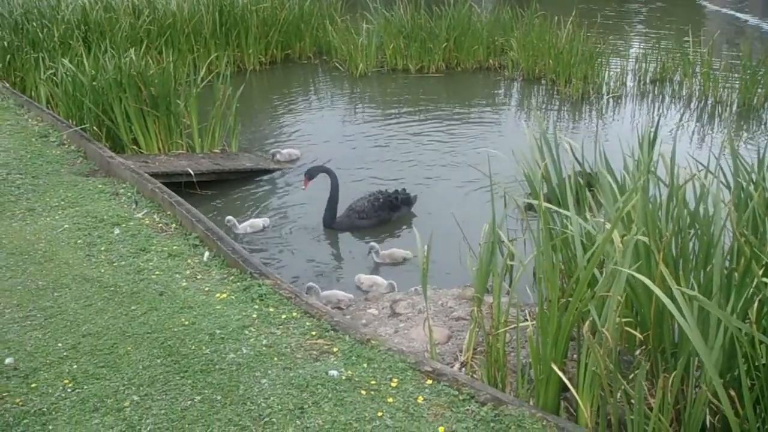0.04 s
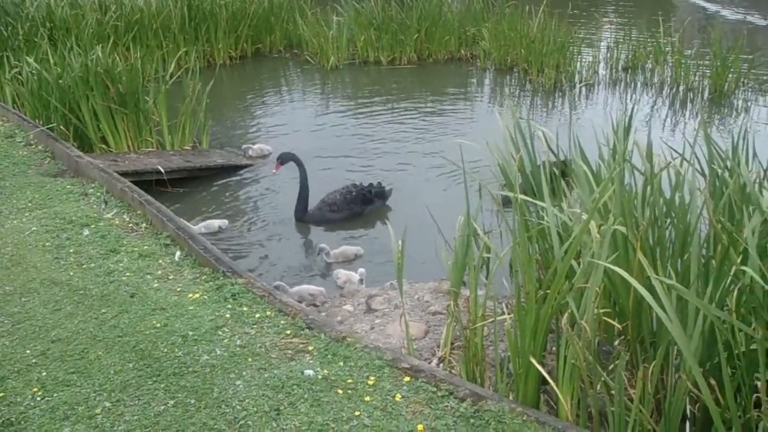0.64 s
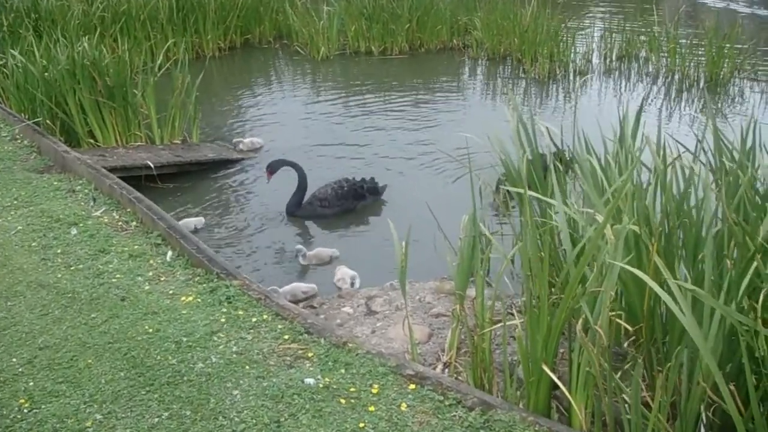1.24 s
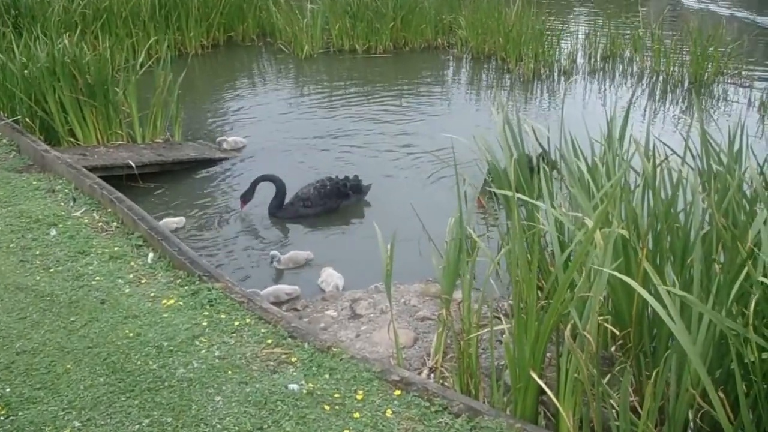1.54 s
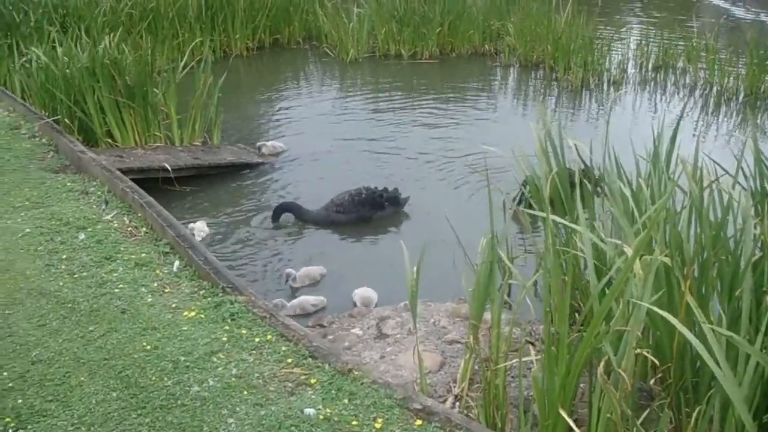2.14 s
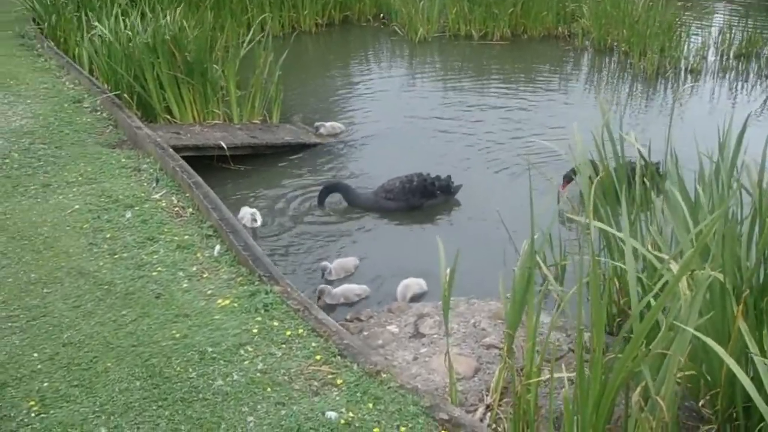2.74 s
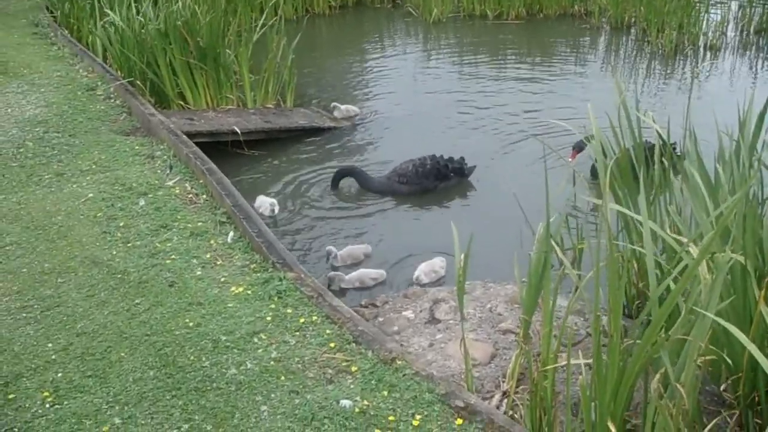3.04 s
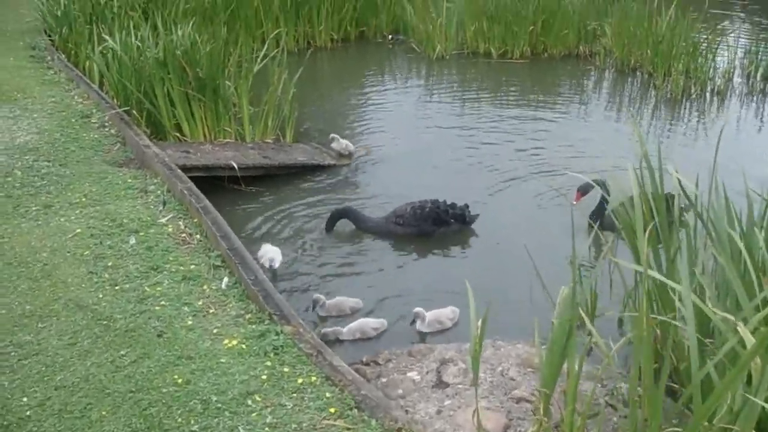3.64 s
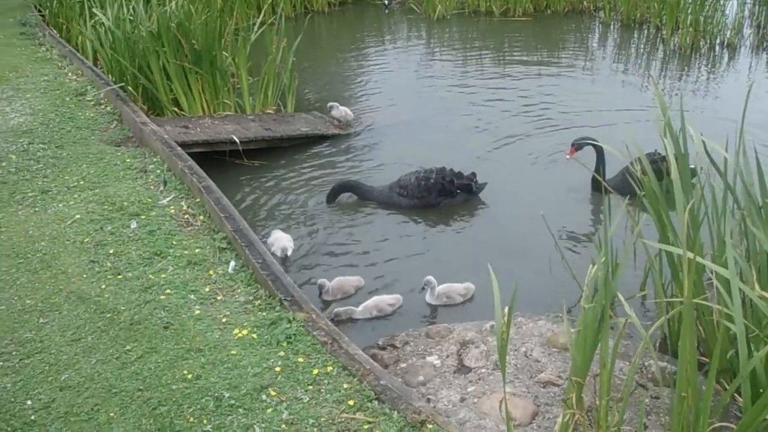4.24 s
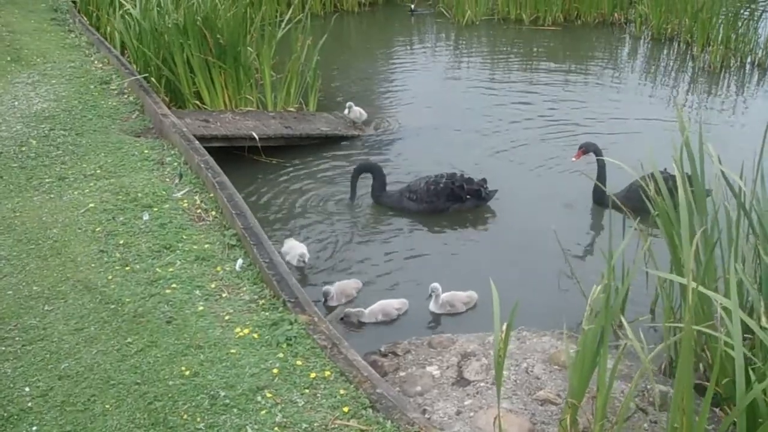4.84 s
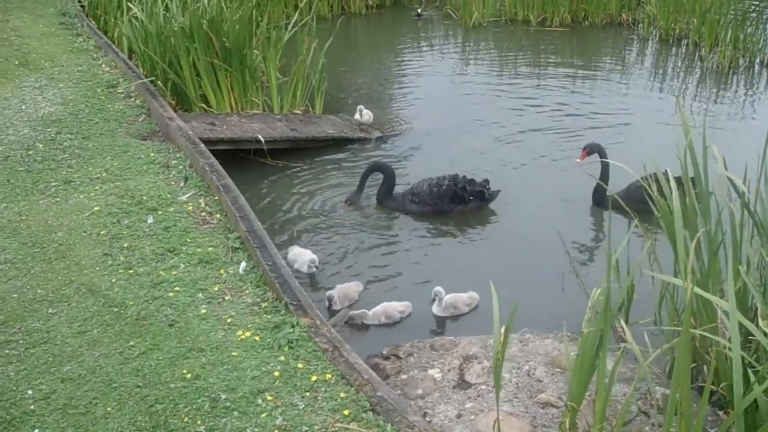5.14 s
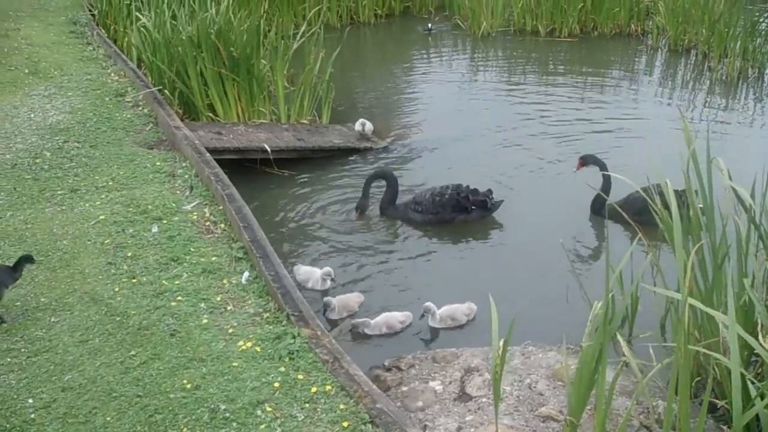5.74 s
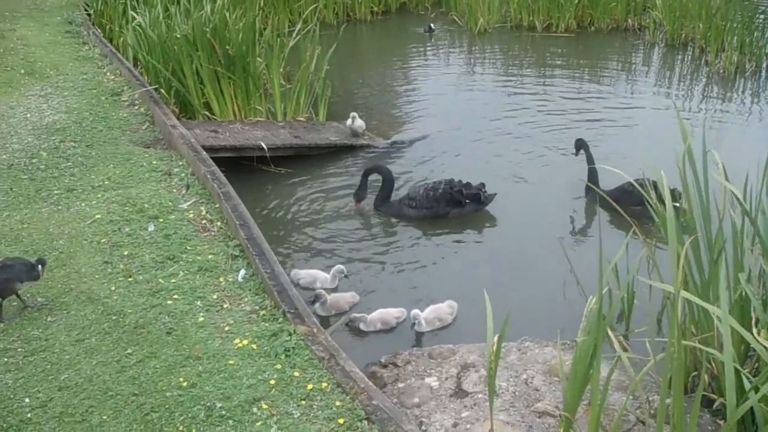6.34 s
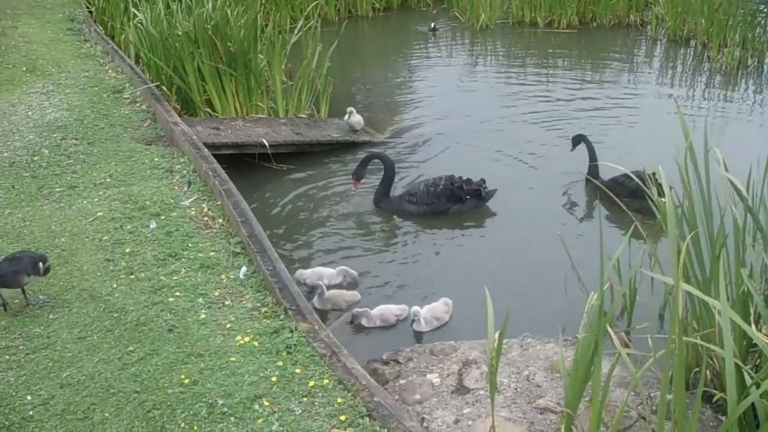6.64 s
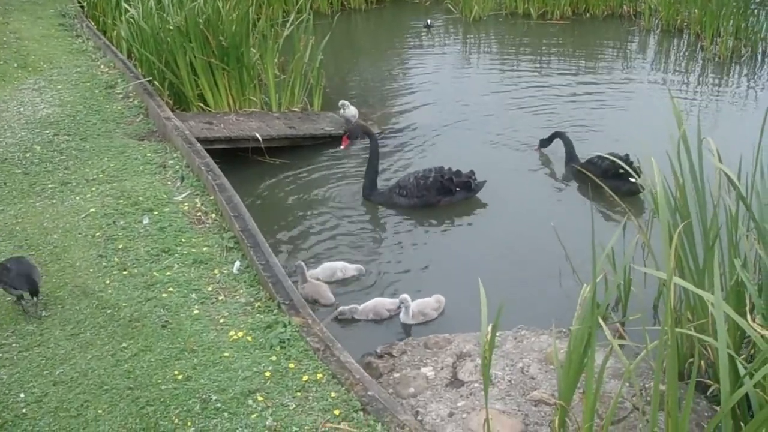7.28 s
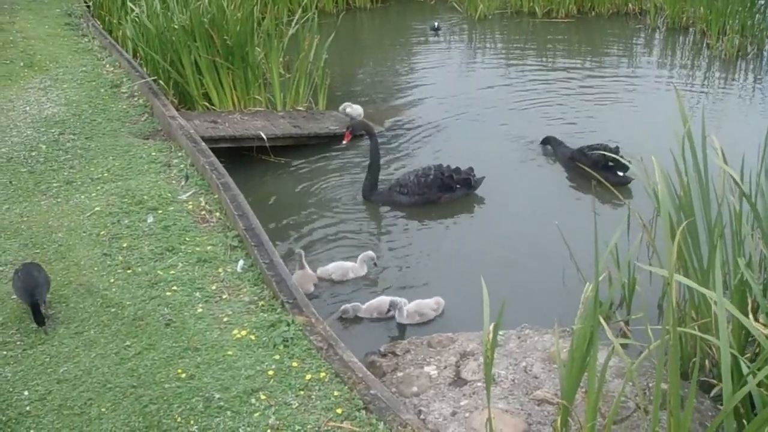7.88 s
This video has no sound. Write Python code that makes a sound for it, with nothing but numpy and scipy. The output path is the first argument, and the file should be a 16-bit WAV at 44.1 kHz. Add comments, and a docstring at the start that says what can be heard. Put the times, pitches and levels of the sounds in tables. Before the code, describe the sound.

Swans give rising, reedy whistled calls while their cygnets peep, with small water drips over a soft outdoor rush.

```python
"""Black swans on a reedy pond

Black swans bugle, a membrane in the syrinx sounding a reedy whistle, while their cygnets peep in quick
arches. Water drips and plops from dabbling bills, reeds tick, and far off a pigeon coos and a low hum
swells over a soft outdoor rush. The air bumps the stereo microphone once; the banks echo faintly."""
import sys
import numpy as np
from scipy import signal
from scipy.fft import rfft, irfft
from scipy.io import wavfile
from scipy.ndimage import uniform_filter1d, map_coordinates

SR = 44100
rng = np.random.default_rng(int(sys.argv[2]) if len(sys.argv) > 2 else 0)


def int16_out(signal):
    """Quantize to a 16-bit WAV file."""
    q = np.round(np.clip(np.atleast_2d(signal).T, -1, 1) * 32767)
    wavfile.write(sys.argv[1], SR, q.astype(np.int16))


N = 357651
BAND_LIMIT_HZ = 14400


def amp(db):
    """Decibels to gain."""
    return 10 ** (np.asarray(db) / 20)


def unit(x):
    """Scales to an rms of 1."""
    return x / np.sqrt(np.mean(x ** 2) + 1e-20)


def read(points, hz):
    """Reads a table on a log-frequency axis."""
    f, value = np.transpose(points)
    return np.interp(np.log(hz + 1), np.log(f + 1), value)


def add(mix, start_s, sound):
    """Mixes a sound in at its start time."""
    part = mix[..., max(round(start_s * SR), 0):][..., :sound.shape[-1]]
    part += sound[..., :part.shape[-1]]


def wander(t, rate_hz):
    """Smooth random motion, rms near 1, at about the given rate."""
    steps = rng.standard_normal(4096)
    return map_coordinates(steps, [(t - t[0]) * 2 * rate_hz], order=3, mode="wrap")


def arch(progress, top):
    """Rises from 0 to 1 at top and falls back as progress runs from 0 to 1."""
    top = np.clip(top, .05, .95)
    return np.sin(np.interp(progress, [0, top, 1], [0, np.pi / 2, np.pi])).clip(0)


# Swans on the pond, one contour a call, up to its closing fall:
# time_s, pitch_hz, fundamental_db, octave_db, reedy_top_db
SWAN_CALLS = [
    [(0.127, 1555, -35, -30, -53), (0.16, 1890, -26.5, -31, -30), (0.203, 2001, -26.5, -36, -35.5),
     (0.25, 1914, -26, -32.5, -34), (0.33, 2133, -23.5, -29, -39.5), (0.45, 2271, -24, -25.5, -53.5),
     (0.51, 2333, -26.5, -25, -44), (0.57, 2396, -29, -30.5, -47)],
    [(2.31, 1360, -52, -55, -74), (2.37, 1420, -48.5, -52, -65), (2.45, 1322, -56, -55, -66),
     (2.52, 1375, -47, -59, -77), (2.63, 1336, -43, -62, -65), (2.69, 1530, -34, -45, -65),
     (2.76, 1542, -31, -42.5, -66), (2.83, 1607, -28, -42, -55), (2.875, 1617, -28, -38.5, -54.5)],
    [(4.135, 1545, -42, -45, -70), (4.19, 1618, -36.5, -48, -66), (4.225, 1787, -36.5, -43.5, -67),
     (4.285, 1744, -36.5, -43.5, -78), (4.41, 1811, -33.5, -38.5, -57), (4.45, 1878, -35, -40, -60),
     (4.5, 1836, -34.5, -39, -54.5)],
    [(4.615, 1550, -67, -36, -55), (4.675, 1843, -41.5, -24, -47), (4.7, 1869, -44, -24, -46),
     (4.737, 1710, -46.5, -26.5, -45.5), (4.771, 1726, -58, -23.5, -49), (4.778, 1873, -43.5, -22.5, -41.5),
     (4.81, 2003, -42, -29.5, -48.5), (4.93, 2247, -29.5, -25.5, -40.5), (5.045, 2425, -27, -23.5, -44),
     (5.052, 2877, -19.5, -31, -43)],
    [(5.924, 1384, -39.5, -54, -74), (6.0, 1436, -34, -50.5, -74), (6.07, 1446, -38.5, -47, -55.5),
     (6.14, 1620, -32.5, -45, -56), (6.19, 1676, -32, -39, -54), (6.27, 1867, -29, -32, -43.5),
     (6.33, 1786, -29, -28.5, -39.5), (6.38, 1847, -26.5, -24.5, -35.5), (6.46, 1836, -27.5, -20.5, -34.5)],
]
# How each call closes: fall_s, pitch_drop_share, swell_db
SWAN_CLOSES = [(0.077, .26, 4.5), (0.061, 0.13, -1.1), (0.14, 0.31, 5.5), (.075, 0.15, 1), (0.086, 0.21, 2)]

def swan_gesture(contour, close, fade_db=-11, overtone_fade_db=-32.5):
    """A call climbs along its contour, then the pitch drops away; the overtones die first."""
    times, *columns = np.transpose(contour)
    fall_s, drop, swell_db = close
    t = np.arange(times[0], times[-1] + fall_s, 1 / SR)
    hz, first_db, octave_db, reed_db = (uniform_filter1d(np.interp(t, times, c), 130) for c in columns)
    fall = np.clip((t - times[-1]) / fall_s, 0, 1)
    hz = hz * (1 - drop * fall ** 2)
    swell, fade = swell_db * np.sin(np.pi * fall), fall ** 4.8
    upper_db = swell + overtone_fade_db * fade
    return t, hz, first_db + swell + fade_db * fade, octave_db + upper_db, reed_db + upper_db


# Timbre of each call: third_partial_offset_db, base_tilt_db_per_octave, shrill_db, hiss_offset_db
SWAN_TIMBRES = [(6.5, -35, 26, -23), (1.5, 15, 0, -15), (0.5, 13, 2, -12), (-7, -3, 1, -9),
                (5.5, 4.5, -4, -15)]
# The throat's effect on the third partial: frequency_hz, gain_db
SWAN_THIRD_PARTIAL = [(4200, -8), (4700, -12), (5150, -15.5), (5600, -19.5), (6000, -10), (6450, -3),
                      (7000, -7), (8500, 3.5)]
# Throat and bill colour of the reedy top: frequency_hz, gain_db
SWAN_THROAT = [(5000, -3), (7500, 10), (9300, 6.5), (10100, 0.5), (11200, 5.5), (11900, 3), (13200, -1.5),
               (14000, -2.5)]
# Hoarse stretches: start_s, end_s, depth_share, flutter_hz
SWAN_HOARSENESS = [(0.124, 0.188, 0.28, 192), (4.66, 4.74, 0.1, 161), (6.12, 6.273, 0.11, 295)]

def swan(contour, close, timbre, shimmer_db=0.72, rasp_db=-32, shrill_hz=13820, shrill_width_hz=770):
    """The syrinx sings a reedy whistle; its overtones swell as the bird presses and opens its bill."""
    t, hz, first_db, octave_db, reed_db = swan_gesture(contour, close)
    third_offset_db, tilt_db, shrill_db, hiss_db = timbre
    third_db = octave_db + third_offset_db + read(SWAN_THIRD_PARTIAL, 3 * hz)
    # a fluttering membrane shakes both pitch and loudness
    flutter = sum(depth * ((t > start) & (t < end)) * np.sin(2 * np.pi * rate * t + wander(t, 60))
                  for start, end, depth, rate in SWAN_HOARSENESS)
    waver = 1 + 0.00258 * wander(t, 20.2) + 0.0028 * wander(t, 150) + 0.042 * flutter
    angle = 2 * np.pi * np.cumsum(hz * waver) / SR
    # the harder the bird presses, the brighter the reedy top, partials 4 to 10
    k = np.arange(4, 11)[:, None]
    slope_db = (tilt_db + 0.39 * (reed_db + 42)) * np.log2(k / 4)
    drift_db = 1.7 * np.array([wander(t, 17.4) for _ in k])
    bill_db = shrill_db * np.exp(-((k * hz - shrill_hz) / shrill_width_hz) ** 2)
    reed = amp(read(SWAN_THROAT, k * hz) + slope_db + bill_db) * (k * hz < BAND_LIMIT_HZ + 500)
    reed *= amp(reed_db + drift_db) / np.sqrt((reed ** 2).sum(0) + 1e-12)
    voice = np.zeros(len(t))
    for number, level in enumerate([amp(first_db), amp(octave_db), amp(third_db), *reed], 1):
        # air rushing past the membrane lays a thin skirt of noise round each partial
        unrest = amp(shimmer_db * wander(t, 47.5)) + amp(rasp_db) * wander(t, 900)
        voice += level * unrest * np.sin(number * angle)
    hiss = amp(reed_db + hiss_db) * unit(np.diff(rng.standard_normal(len(t) + 1)))
    return t[0], np.sqrt(2) * (voice + hiss) * (1 + flutter) * signal.windows.tukey(len(t), .015)


def peep_gesture(start_s, length_s, start_hz, top_hz, end_hz, db, choke_db, overtone_db, trail_db=-1):
    """One arch of a cygnet's voice, which may choke at its top: time, pitch, level, overtone level."""
    progress = np.linspace(0, 1, 60)
    top = .57 - 1.05 * length_s  # longer peeps peak earlier
    height = arch(progress, top) ** 1.1
    foot_hz = np.where(progress < top, start_hz, end_hz)
    hz = foot_hz + (top_hz - foot_hz) * height
    level_db = db + trail_db * (progress - .5)
    choked_db = level_db - choke_db * height ** 2.3
    return np.array([start_s + length_s * progress, hz, choked_db, level_db + overtone_db])


# The cygnets' peeps:
# start_s, length_s, start_hz, top_hz, end_hz, level_db, choke_db, overtone_offset_db
PEEPS = [ (-.035, 0.086, 2700, 3770, 2530, -39.5, 7, -19), (0.061, 0.11, 2600, 3690, 2120, -38.5, 23, -24),
         (0.175, 0.061, 2170, 2950, 2010, -38, 5, -18), (1.123, .114, 1806, 3610, 2170, -38, 18, -27),
         (1.241, 0.15, 2220, 3690, 2130, -41.5, 21, -21), (1.37, .096, 2190, 2820, 1770, -43, -1, -17),
         (2.333, .085, 2054, 2460, 2140, -50.5, -2, -14), (2.416, 0.065, 2170, 2550, 1884, -47, 0, -16),
         (2.483, 0.062, 1930, 2300, 1750, -44.5, 4, -12), (2.425, .043, 1710, 1780, 1910, -49, -5, 10),
         (2.915, 0.079, 2050, 2406, 1980, -48.5, -4, -8), (2.991, 0.065, 2016, 2550, 1840, -43.5, -3, -5.5),
         (3.062, 0.057, 1866, 2190, 1720, -45.5, -5.5, -12), (3.474, 0.15, 1710, 3450, 1944, -49.5, 1, 1.5),
         (3.757, 0.16, 1800, 3740, 1960, -52, -3.5, -8), (4.115, 0.13, 1810, 3740, 2150, -50.5, -4.5, -8),
         (4.954, 0.076, 2290, 2870, 2250, -43, -1, -12), (5.111, 0.066, 2375, 2610, 1980, -46.5, -3, -4.5),
         (5.2, 0.12, 2100, 2780, 2154, -42, -4, -19), (6.006, 0.086, 2100, 3240, 2380, -36, 5, -12),
         (6.14, 0.11, 2330, 2870, 1950, -38, 1, -14), (6.087, 0.056, 2256, 2450, 2124, -40, -3, -9),
         (6.158, 0.066, 2040, 2410, 1850, -45.5, -10, -1), (6.235, 0.08, 1744, 2350, 1850, -49, -8, -6),
         (6.352, .14, 2230, 3750, 2297, -48, 4, -10), (6.613, 0.14, 2030, 4590, 2180, -40.5, 5.5, -9),
         (7.337, 0.084, 2133, 2720, 2470, -48.5, -3, -28), (7.4, 0.068, 2600, 2880, 2380, -52, -8, -28),
         (7.475, 0.052, 2430, 2700, 2300, -51, -7.5, -28), ]

def peep_phrases(slur_s=.02):
    """Slurs each peep onto the one before when it starts where that one ends."""
    phrases = []
    for row in PEEPS:
        gesture = peep_gesture(*row)
        if phrases and abs(gesture[0, 0] - phrases[-1][0, -1]) < slur_s:
            gesture = np.hstack([phrases.pop(), gesture])
        phrases.append(gesture)
    return phrases


# Resonances of a cygnet's throat: frequency_hz, gain_db
CYGNET_THROAT = [(3700, -16), (4800, 2), (5900, -15.5), (7200, -6.5), (9000, -18), (14000, -28)]

def cygnet(phrase, shimmer_db=3.1, glide_s=0.013, edge_s=0.0069):
    """A small arching whistle; its overtones flash as they cross the throat's resonances."""
    times, *columns = phrase[:, np.argsort(phrase[0])]
    t = np.arange(max(times[0], 0), times[-1], 1 / SR)
    hz, db, overtone_db = (uniform_filter1d(np.interp(t, times, c), int(glide_s * SR) + 1, mode="nearest")
                           for c in columns)
    strain = hz / 3200  # the voice grows unsteady at the top of each arch
    jitter = (0.0054 + 0.006 * strain ** 3) * wander(t, 200)
    angle = 2 * np.pi * np.cumsum(hz * (1 + jitter)) / SR
    overtones = sum(amp(read(CYGNET_THROAT, k * hz)) * np.cos(k * angle) / (k - 1) for k in (2, 3))
    voice = amp(db) * np.cos(angle) + amp(overtone_db) * overtones
    shimmer = amp(shimmer_db * strain * wander(t, 94.2))
    return t[0], np.sqrt(2) * voice * shimmer * signal.windows.tukey(len(t), 2 * edge_s * SR / len(t))


# The birds at the microphone: frequency_hz, left_over_right_db
SWAN_BALANCE = [(1500, 1.4), (2300, 0.52), (3600, 0.86), (4600, 0.76), (5500, 1.8), (6700, 9.2),
                (7500, 3.5), (12000, 1.9)]
CYGNET_BALANCE = [(2000, 1), (8000, 1)]
# Their phase between its two ports: frequency_hz, left_lead_rad
SWAN_PHASE = [(1500, -0.012), (2300, -0.22), (3600, 0.063), (4500, 0.95), (5500, 0.14), (6800, -0.45),
              (12000, -0.68)]
CYGNET_PHASE = [(2000, -0.33), (4000, -0.31), (6500, 1), (10000, -0.4)]

def microphone_ports(x, balance, phase):
    """A sound reaches the left and right ports at different levels and phases."""
    hz = np.fft.rfftfreq(2 * N, 1 / SR)
    half = amp(read(balance, hz) / 2) * np.exp(.5j * read(phase, hz))
    return irfft(rfft(x, 2 * N) * np.array([half, 1 / half]))[:, :N]


# Drops landing in the pond, heard in the centre: start_s, level_db, pitch_hz, t60_s
PLOPS = [(3.704, -22.5, 2600, 0.0075), (3.7051, -23.5, 965, 0.01), (3.7074, -29, 560, 0.013),
         (4.2, -41, 2660, .012), (7.067, -33, 2800, 0.0099), (7.289, -38, 1710, 0.013)]

def plop(db, hz, t60, rise=0.067):
    """A trapped bubble rings briefly and rises in pitch."""
    t = np.arange(3000) / SR
    return amp(db - 60 * t / t60) * np.sin(2 * np.pi * hz * t * (1 + rise * np.minimum(t / t60, 1)))


# Reed ticks and bill splashes that stand out at the microphone: start_s, peak_db, centre_hz, t60_s
TICKS = [(.889, -33, 9000, 0.0062), (2.0938, -37, 5140, 0.02), (2.3913, -35, 7900, .01),
         (2.44, -37, 5450, 0.044), (2.632, -22.5, 11600, 0.003), (3.586, -26, 7000, 0.027),
         (3.7037, -23, 9000, 0.0035), (3.998, -31.5, 7000, 0.027), (5.97, -33, 8000, 0.022),
         (6.15, -27, 12570, 0.072), (7.067, -37, 9000, 0.0042), (7.3902, -33, 11000, 0.0052),
         (7.785, -36.5, 2400, 0.063)]

def tick(db, hz, t60, octaves=1.0):
    """A tiny dry crack: a burst of bright noise, slightly different at each port."""
    t, f = np.arange(3000) / SR, np.fft.rfftfreq(3000, 1 / SR)
    colour = np.exp(-.5 * (np.log2((f + 1) / hz) / octaves) ** 2)
    noise = rng.standard_normal(3000) + 0.29 * rng.standard_normal((2, 3000))
    burst = irfft(rfft(noise) * colour) * amp(-60 * t / t60)
    return amp(db) * burst / abs(burst).max()


def dabbling_and_reeds(drips=130, reed_ticks=220):
    """Bills drip well to the right of the microphone while reeds tick faintly on both sides."""
    pond = np.zeros((2, N))
    for when, faintness, pitch, side in rng.random((drips, 4)):
        drip = tick(-53 - 5.5 * np.log(faintness + .2), 1200 * 4 ** pitch, 0.02, octaves=0.65)
        pan_right = amp(np.array([[1], [-1]]) * 3.3 * (side - 5.0))
        add(pond, when * N / SR, drip * pan_right)
    for when, faintness, pitch in rng.random((reed_ticks, 3)):
        add(pond, when * N / SR, tick(-56 - 5.5 * np.log(faintness + 0.057), 4000 * 3 ** pitch, 0.036))
    return pond


# A pigeon far off: start_s, length_s, top_hz, top_place_share, level_db (before trim)
COOS = [(2.88, 0.25, 516, .45, -61), (4.1, .3, 520, 0.43, -58.5), (5.66, 0.45, 479.4, 0.8, -50),
        (6.27, 0.22, 556.5, .3, -49.5), (6.998, 0.143, 520, 0.41, -50.5), (7.294, 0.33, 491, 0.1, -48),
        (8.04, 0.18, 531, 0.66, -49)]
# A faint distant hum, same columns
FAR_HUM = (0, 1.5, 277, 0.5, -64.5)

def coo_or_hum(start_s, length_s, top_hz, top, db, sag, ends_db=-5, trim_db=-2, husk=0.61):
    """A far, hollow tone with a husky waver; pitch and level sag at both ends of one arch."""
    t = np.arange(0, length_s, 1 / SR)
    slack = 1 - arch(t / length_s, top)
    hz = top_hz * (1 - sag * slack) * (1 + 0.02 * wander(t, 52.1))
    angle = 2 * np.pi * np.cumsum(hz) / SR
    tone = np.sin(angle) + husk * wander(t, 90) * np.cos(angle)
    level = amp(db + ends_db * slack + trim_db + 2 * wander(t, 32.2))
    return start_s, np.sqrt(2) * level * tone * signal.windows.tukey(len(t), .15)


# Air right on the microphone: start_s, level_db (before each port's gain), pitch_hz, length_s
AIR_BUMPS = [(3.356, -44, 47.6, 0.067)]

def air_bump(db, hz, length_s):
    """A puff of air gives a low thump, stronger at the left port."""
    t = np.arange(0, length_s, 1 / SR)
    return amp(db + np.array([[3], [-7]])) * np.sin(2 * np.pi * hz * t) * np.hanning(len(t))


# Decay of the echo round the pond: frequency_hz, t60_s
BANK_DECAY = [(300, 0.97), (2000, 0.92), (7000, 0.67), (14000, 0.52)]

def bank_echo(x, reflections_per_s=2000, delay_s=.012):
    """Sparse late reflections from reeds and banks, each band dying at its own speed."""
    taps = rng.choice([-1., 1.], (2, SR)) * (rng.random((2, SR)) < reflections_per_s / SR)
    taps *= np.arange(SR) > delay_s * SR
    hz, t, spectrum = signal.stft(taps, SR, nperseg=256)
    tail = signal.istft(spectrum * amp(-60 * t / read(BANK_DECAY, hz)[:, None]), SR, nperseg=256)[1]
    return signal.fftconvolve(x[None], tail / np.linalg.norm(tail[0]), axes=1)[:, :N]


# The open air behind everything: frequency_hz, relative_level_db
AIR_SPECTRUM = [(15, -52), (25, -8), (108, 1), (193, -3.5), (259, -2), (396, -7), (452, -3), (1030, -2.5),
                (1270, -6), (2170, -6.5), (2680, -14), (3060, -9.5), (6440, -18.5), (12900, -20),
                (14300, -19.5)]
# How alike it is at the two ports: frequency_hz, correlation
AIR_LIKENESS = [(60, 0.91), (150, 0.7), (370, 0.69), (930, 0.9), (2330, 0.79), (5820, 0.031),
                (14500, -0.32)]

def open_air(level_db=-46.5, patchy_db=1.41, lean_left_db=.5):
    """Distant rush and breeze in the reeds, with drifting patches."""
    frames, hz = N // 512 + 5, np.fft.rfftfreq(2048, 1 / SR)
    a, b, c, d, patches = rng.standard_normal((5, frames, len(hz)))
    patches = unit(uniform_filter1d(uniform_filter1d(patches, size=9, axis=0), size=24, axis=1))
    likeness = np.clip(read(AIR_LIKENESS, hz), -1, 1)
    left = a + 1j * b
    right = likeness * left + np.sqrt(1 - likeness ** 2) * (c + 1j * d)
    spectrum = np.array([left * amp(lean_left_db), right / amp(lean_left_db)])
    spectrum *= amp(read(AIR_SPECTRUM, hz) + patchy_db * patches)
    rush = signal.istft(spectrum.transpose(0, 2, 1), nperseg=2048, noverlap=1536)[1][:, :N]
    return unit(rush) * amp(level_db)


def scene():
    """Birds, water and reeds over the open air, heard from beside the pond."""
    swans, cygnets, far, plops = np.zeros((4, N))
    small_sounds = dabbling_and_reeds()
    for call in zip(SWAN_CALLS, SWAN_CLOSES, SWAN_TIMBRES):
        add(swans, *swan(*call))
    for phrase in peep_phrases():
        add(cygnets, *cygnet(phrase))
    for coo in COOS:
        add(far, *coo_or_hum(*coo, sag=.17))
    add(far, *coo_or_hum(*FAR_HUM, sag=.06))
    for start_s, *row in PLOPS:
        add(plops, start_s, plop(*row))
    for start_s, *row in TICKS:
        add(small_sounds, start_s, tick(*row))
    for start_s, *row in AIR_BUMPS:
        add(small_sounds, start_s, air_bump(*row))
    birds = microphone_ports(swans, SWAN_BALANCE, SWAN_PHASE)
    birds += microphone_ports(cygnets, CYGNET_BALANCE, CYGNET_PHASE)
    echo = bank_echo(amp(-29.5) * swans + amp(-18.5) * (cygnets + plops) + amp(-18) * far)
    return birds + far + plops + small_sounds + echo + open_air()


def record(dry):
    """The recorder's band limit cuts the highest treble."""
    lowpass = signal.firwin(511, BAND_LIMIT_HZ, window=("kaiser", 9), fs=SR)
    return signal.oaconvolve(dry, lowpass[None], "same")


dry = scene()
out = record(dry)
int16_out(out)
```